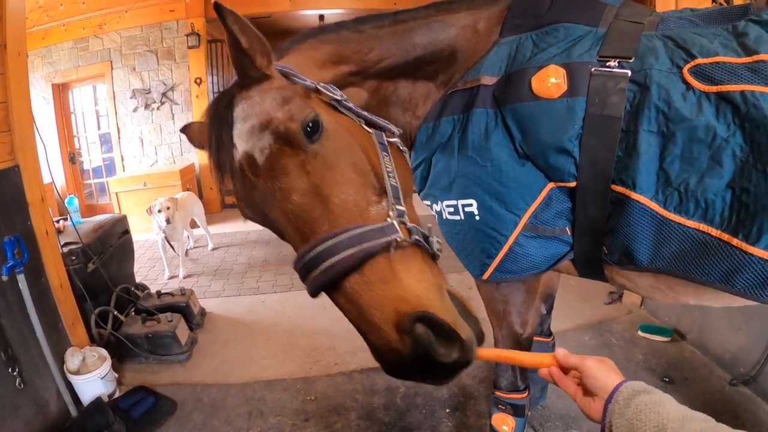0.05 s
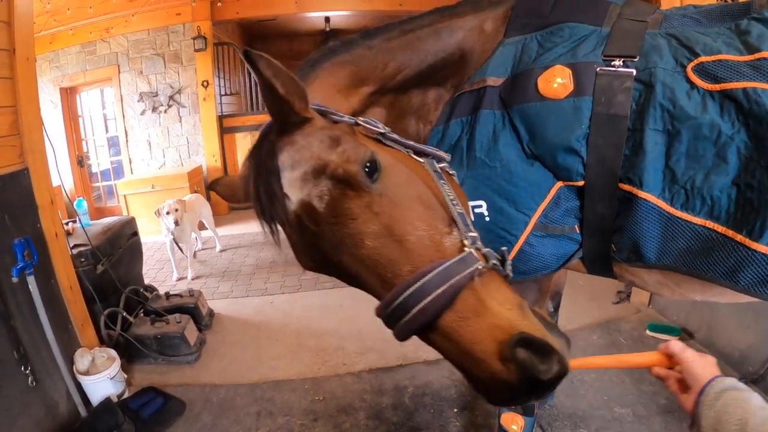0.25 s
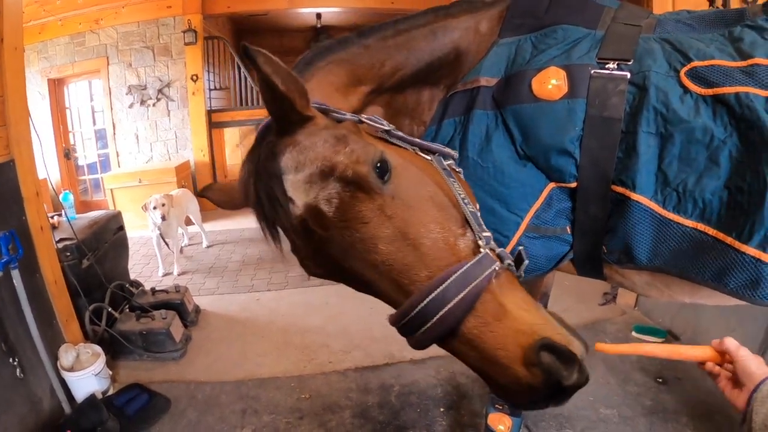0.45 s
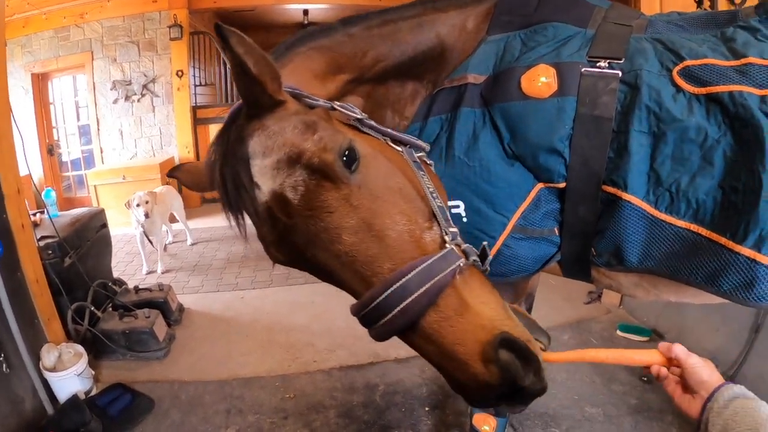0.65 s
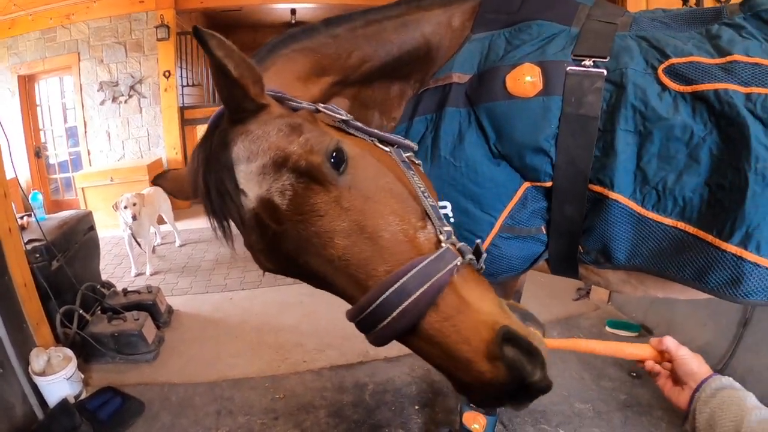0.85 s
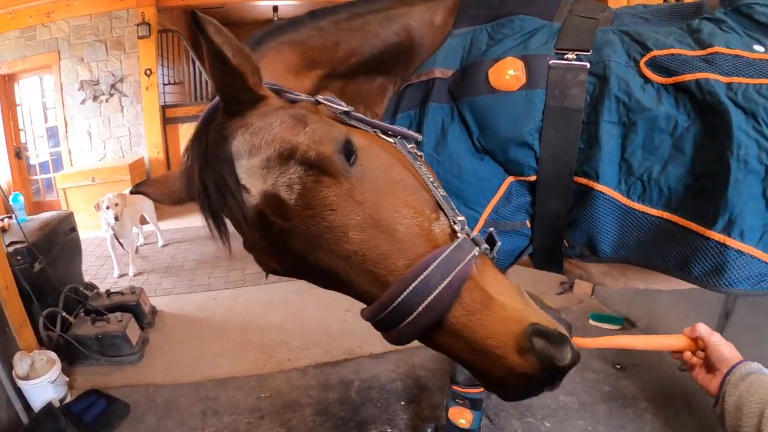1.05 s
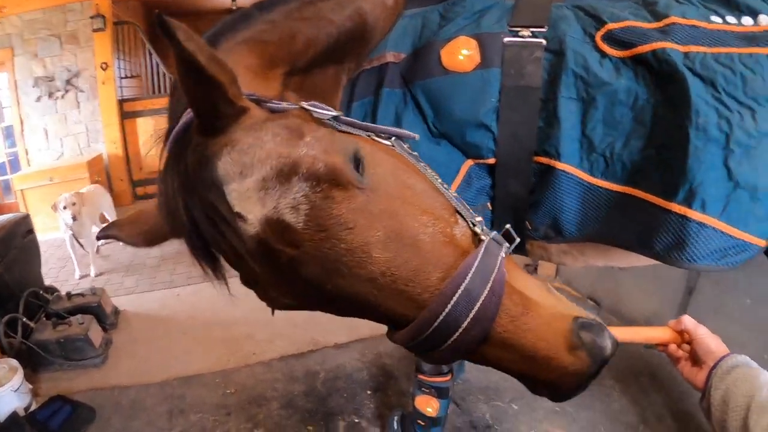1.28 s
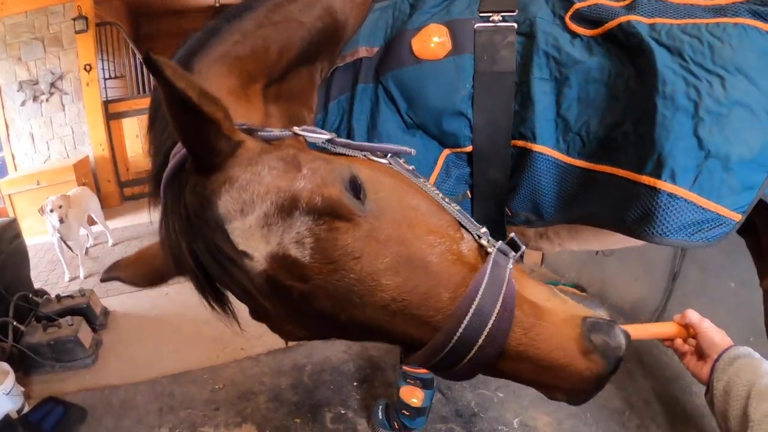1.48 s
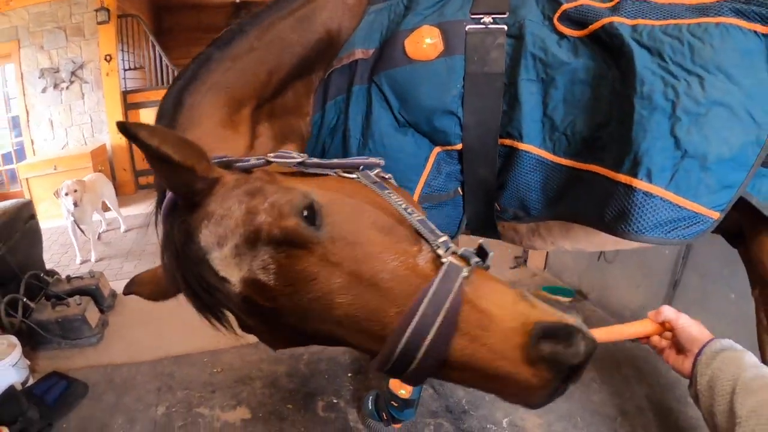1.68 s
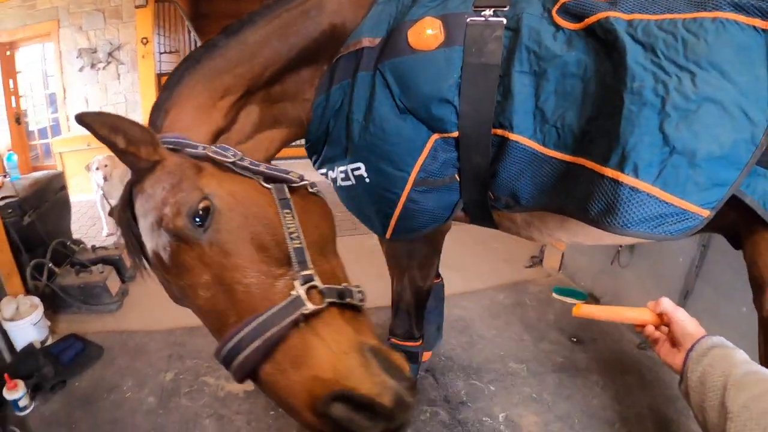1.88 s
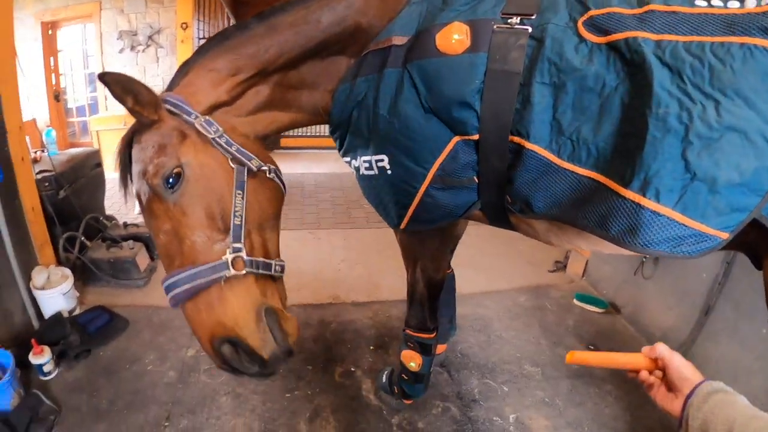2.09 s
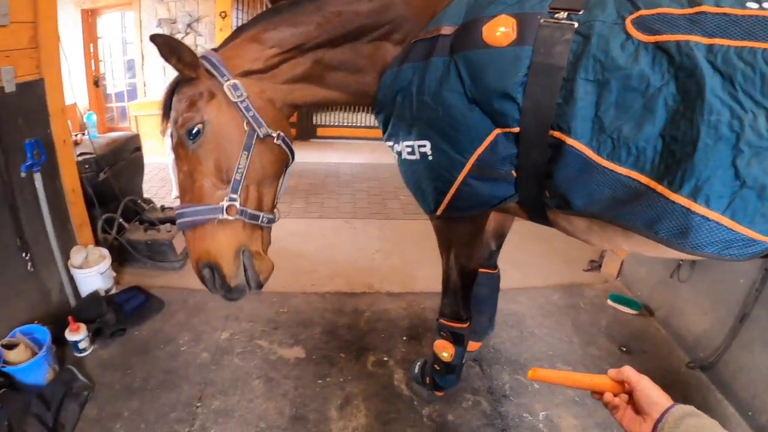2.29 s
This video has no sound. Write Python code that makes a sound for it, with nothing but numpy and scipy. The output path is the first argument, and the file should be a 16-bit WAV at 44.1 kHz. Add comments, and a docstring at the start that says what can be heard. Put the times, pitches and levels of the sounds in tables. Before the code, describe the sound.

A horse mouths a raw carrot with soft wet lip pops, then snaps off a piece.

```python
"""Soft lip pops and wet ticks, close to the microphone: a horse mouths a raw carrot in a quiet stable.
Near the end it snaps a piece off, a few quick cracks that ring the mouth and burst a spray of wet cells.
The stable answers with a short tail and one dull echo from the nearest wall.
Underneath lie a faint hiss and the slow buffeting of air on the moving microphone."""
import sys
import numpy as np
from scipy import signal
from scipy.fft import rfft, irfft
from scipy.io import wavfile

SR = 44100
rng = np.random.default_rng(int(sys.argv[2]) if len(sys.argv) > 2 else 0)


def int16_out(signal):
    """Quantize to a 16-bit WAV file."""
    q = np.round(np.clip(np.atleast_2d(signal).T, -1, 1) * 32767)
    wavfile.write(sys.argv[1], SR, q.astype(np.int16))


N = 102885

# steps of the carrot's fracture: start_s, thump_db, spray_db
CARROT_CRACKS = [(1.8103, -23.5, -45), (1.8136, -18, -47), (1.8242, -13, -13), (1.8277, -18.5, -1.5),
                 (1.83, -9, -5), (1.8289, 1.5, -5.5), (1.8357, -27, -5.5)]
# ringing of carrot, teeth and mouth: pitch_hz, level_db, t60_s
MOUTH_MODES = [(247.6, -10.5, 0.022), (403, -9.5, 0.017), (602, -22, 0.019), (1376, -17, 0.018),
               (1700, -28, 0.0053), (1980, -23, 0.01), (2325, -23.5, 0.018), (2700, -33.5, 0.042)]
# tone of the bursting cells: frequency_hz, density_db
SPRAY_SPECTRUM = [(150, 0.5), (500, -29), (950, -5.5), (1350, 5.5), (1650, 3), (2600, -4.5), (3400, -11.5),
                  (5700, -8.5), (6550, -0.5), (7800, 1), (10000, -2.5), (13000, -13), (16000, -20.5)]
# hollow pops of lips and tongue: start_s, pitch_hz, level_db, t60_s
LIP_POPS = [(.020, 380, -40, 0.017), (.046, 382, -42.5, 0.054), (.070, 360, -43, 0.028),
            (.1422, 930, -21, 0.0063), (.1424, 1580, -39, 0.011), (.1440, 314, -31.5, .025),
            (.4036, 660, -38.5, 0.0096), (.4042, 380, -33, 0.031), (.778, 230, -40.5, 0.017),
            (.826, 252, -46.5, 0.062), (1.000, 368, -41, 0.041), (1.056, 312, -44, 0.057),
            (1.276, 205, -47, 0.043), (1.6735, 324, -26.5, 0.033), (1.6738, 574, -32.5, 0.019),
            (1.693, 429, -34, 0.019), (1.731, 412, -35.5, 0.017), (1.7392, 308, -27.5, 0.017),
            (1.74, 179, -37.5, 0.12), (1.763, 516, -42, 0.03), (2.1055, 550, -32, 0.021)]
# wet ticks of the lips: start_s, centre_hz, level_db
LIP_TICKS = [(.035, 2940, -31.5), (.043, 1420, -29), (.061, 1460, -33), (.079, 4000, -36.5),
             (0.167, 6170, -36), (.175, 4340, -35), (0.316, 4040, -33), (0.358, 7500, -29.5),
             (0.358, 2970, -34), (0.4037, 2500, -44), (.938, 910, -33), (.952, 3170, -34.5),
             (.968, 2440, -30), (.976, 3730, -34), (1.000, 7400, -38), (1.078, 8000, -38.5),
             (1.278, 1500, -30), (1.358, 7640, -33.5), (1.417, 2690, -25.5), (1.612, 7260, -34),
             (1.645, 7500, -33.5), (2.0075, 1290, -20), (2.071, 2500, -35), (2.105, 1270, -30.5)]
# soft brushes of the muzzle: middle_s, half_length_s, level_db
MUZZLE_BRUSHES = [(0.051, 0.027, -53.5), (0.599, 0.031, -51), (1.563, 0.064, -56), (2.044, 0.056, -52.5)]
# tone of the brushing: frequency_hz, density_db
BRUSH_SPECTRUM = [(200, 0), (800, -6.5), (1400, 3.5), (2200, -8), (3200, -9), (7000, -21.5), (16000, -31)]
# the stable's tail, band by band: centre_hz, level_db, t60_s, build_up_s
TAIL_BANDS = [(100, -12, 0.34, 0.075), (255, -11.5, 0.56, 0.027), (483, -14.5, 1, 0.0067),
              (940, -2.5, 0.54, 0.0043), (1470, -7.5, 0.43, 0.019), (2450, -10.5, 0.58, 0.021),
              (4630, -0.5, 0.53, 0.0024), (7360, -3, 0.45, 0.0042), (10800, -4, 0.32, 0.0036),
              (16000, -5, 0.23, 0.0083)]
# standing waves between the walls: pitch_hz, level_db, t60_s
STANDING_WAVES = [(204.4, -65.5, 0.294), (274.4, -57.5, 0.31), (372, -57.5, 0.14), (592, -60.5, 0.25),
                  (700, -60, 0.39), (836, -61.5, 1), (1220, -68, 0.31), (1373, -65, 0.27),
                  (1437, -58, 0.29), (2354, -63, .28), (6610, -57, 0.25), (7774, -52, .25)]
# tone of the hiss: frequency_hz, density_db
HISS_SPECTRUM = [(40, 6.5), (80, -1), (150, -1.5), (350, -3), (600, -2), (1400, -8), (3500, -13),
                 (8400, -17), (12000, -21), (16000, -22)]
# rise and fall of the hiss: time_s, level_db
HISS_LEVELS = [(0, -56.5), (.35, -57), (.95, -58), (1.25, -54), (1.55, -52.5), (1.8, -50), (2.05, -52.5),
               (2.33, -54.5)]
# tone of the air on the microphone: frequency_hz, density_db
BUFFET_SPECTRUM = [(1, -7), (4, 5), (12, -4.5), (20, -20), (35, -26.5), (60, -48), (120, -116), (400, -100)]
# strength of that buffeting: time_s, level_db
BUFFET_LEVELS = [(0, -42.5), (.1, -32), (1.05, -36), (1.3, -25), (2.1, -25), (2.33, -23)]


def carrot(cells_per_s=12000, scatter_db=6.5, burst_s=0.00071, tear_s=0.0072, tear_db=-11.5):
    """Close up, each crack thumps the mouth and bursts a shower of cells, gone in milliseconds."""
    t, spray_tone, out = clock(), colour(SPRAY_SPECTRUM), 0
    mouth = butter(ring(MOUTH_MODES), 4, 210, "high")  # too small to radiate deep bass
    burst = np.exp(-t / burst_s) + undb(tear_db) * np.exp(-t / tear_s)  # then a weaker tearing
    for start_s, thump_db, spray_db in CARROT_CRACKS:
        cells = (rng.random(N) < cells_per_s / SR) * rng.choice([-1, 1], N)
        strength = undb(scatter_db * rng.standard_normal(N))
        spray = unit(through(cells * strength * burst, spray_tone))
        out += delay(undb(thump_db) * mouth + undb(spray_db + 0.5) * spray, start_s)
    return out


def lips(pitch_sag=0.02, rise_share=0.14, click_db=-19, wet_s=0.0017, half_band_octaves=0.43):
    """Parting lips open small cavities that ring for a few cycles; films of saliva tick."""
    t, out = clock(), 0
    wet_decay = np.exp(-t / wet_s)
    for start_s, hz, db, t60 in LIP_POPS:
        pitch = hz * (1 + pitch_sag * (fade(t60) - .5))
        rise = 1 - np.exp(-t / (rise_share * t60))
        hollow = 2 * np.sin(2 * np.pi * np.cumsum(pitch) / SR) * rise * fade(t60)
        click = undb(click_db) * butter(rng.standard_normal(N) * wet_decay, 2, 4 * hz)
        out += delay(undb(db) * (hollow + click), start_s)
    for start_s, hz, db in LIP_TICKS:
        edges_hz = hz * 2 ** (np.array([-1, 1]) * half_band_octaves)
        film = butter(rng.standard_normal(N) * wet_decay, 2, edges_hz, "band")
        out += delay(undb(db) * unit(film), start_s)
    return out


def muzzle():
    """The muzzle brushes in short, soft swells of noise."""
    swells = sum(undb(db) * np.exp(-((clock() - s) / half) ** 2) for s, half, db in MUZZLE_BRUSHES)
    return noise(BRUSH_SPECTRUM) * swells


def stable(x, early_db=1.5, early_s=0.051, wall_s=0.027, wall_db=-18.5, wall_hz=447):
    """The walls return a diffuse tail whose lows come late, one dull echo and a few standing waves."""
    t, tail, centres_hz = clock(), 0, np.array(TAIL_BANDS)[:, 0]
    scatter = rfft(rng.standard_normal(2 * N))
    early = 1 + undb(early_db) * np.exp(-t / early_s)  # the first reflections are stronger
    for share, (_, db, t60, build_s) in zip(np.eye(len(centres_hz)), TAIL_BANDS):
        band = irfft(scatter * on_axis(centres_hz, share))[:N]
        build_up = 1 - np.exp(-(t / build_s) ** 2)
        tail += undb(db) * band * unit(build_up * early * fade(t60))
    echo = undb(wall_db) * butter(x, 1, wall_hz)
    standing = through(x, ring(STANDING_WAVES))
    return through(x, tail) + delay(echo + standing, wall_s)


def air():
    """Faint hiss that grows as the horse leans in, and air buffeting the moving microphone."""
    hiss = noise(HISS_SPECTRUM) * undb(np.interp(clock(), *np.array(HISS_LEVELS).T))
    buffet = noise(BUFFET_SPECTRUM) * undb(np.interp(clock(), *np.array(BUFFET_LEVELS).T))
    return hiss + buffet


def undb(db):
    """Decibels to gain."""
    return 10 ** (np.asarray(db) / 20)


def clock():
    """Time of every sample, in seconds."""
    return np.arange(N) / SR


def fade(t60):
    """Exponential decay by 60 dB in t60 seconds."""
    return np.exp(-np.log(1000) * clock() / t60)


def delay(x, s):
    """The sound, s seconds later."""
    return np.concatenate([np.zeros(round(s * SR)), x])[:N]


def butter(x, order, hz, kind="low"):
    """The sound through a Butterworth filter."""
    return signal.sosfilt(signal.butter(order, hz, kind, fs=SR, output="sos"), x)


def through(x, response):
    """The sound played through an impulse response."""
    return signal.fftconvolve(x, response)[:N]


def unit(x):
    """Scaled to unit energy."""
    return x / np.sqrt(np.sum(x ** 2) + 1e-18)


def on_axis(hz, values):
    """Values joined on a log-frequency axis, one for each bin."""
    return np.interp(np.log(np.arange(N + 1) * SR / (2 * N) + 0.0013), np.log(hz), values)


def colour(spectrum):
    """Causal unit-energy response with the given spectrum."""
    cepstrum = irfft(np.log(undb(on_axis(*np.array(spectrum).T))))
    cepstrum[1:N] *= 2  # folded for minimum phase
    cepstrum[N:] = 0
    return unit(irfft(np.exp(rfft(cepstrum)))[:N])


def noise(spectrum):
    """Steady noise of rms 1 with the given spectrum."""
    gains = undb(on_axis(*np.array(spectrum).T))
    x = irfft(rfft(rng.standard_normal(2 * N)) * gains)[:N]
    return x / np.std(x)


def ring(modes):
    """Impulse response of damped modes."""
    return sum(undb(db) * fade(t60) * np.sin(2 * np.pi * hz * clock()) for hz, db, t60 in modes)


def scene(nibble_to_room_db=-9):
    """One microphone close to the horse's mouth, with the stable all around."""
    snap_to_mic, snap_to_walls = carrot(), carrot()  # each direction gets its own spray
    nibble = lips() + muzzle()
    room = stable(snap_to_walls + undb(nibble_to_room_db) * nibble)
    return (snap_to_mic + nibble + room + air())[None]


def record(dry, top_hz=15900):
    """The recorder cuts the highest treble steeply."""
    return signal.sosfilt(signal.ellip(10, .1, 80, top_hz, fs=SR, output="sos"), dry)


dry = scene()
out = record(dry)
int16_out(out)
```